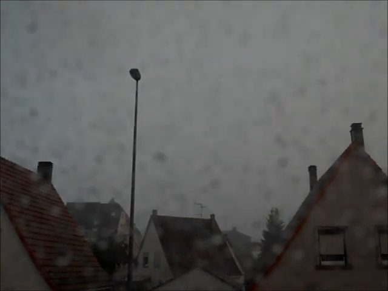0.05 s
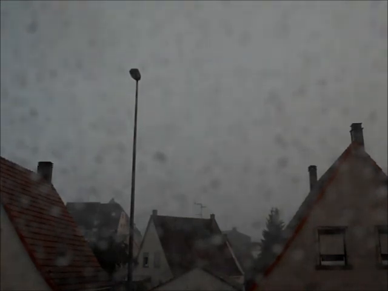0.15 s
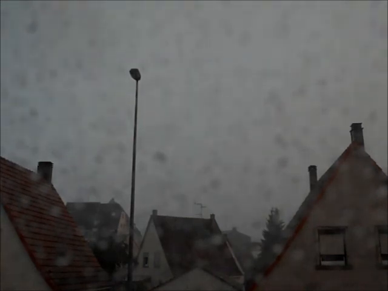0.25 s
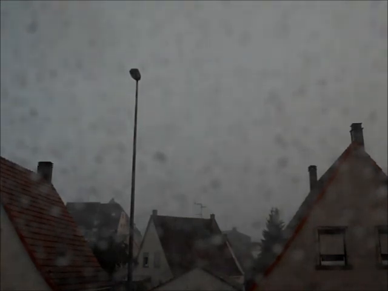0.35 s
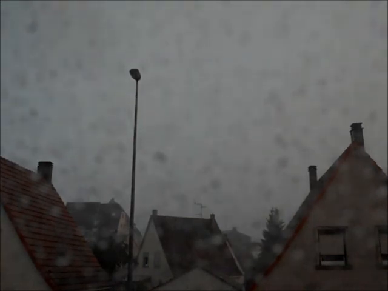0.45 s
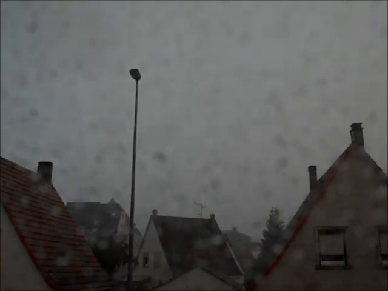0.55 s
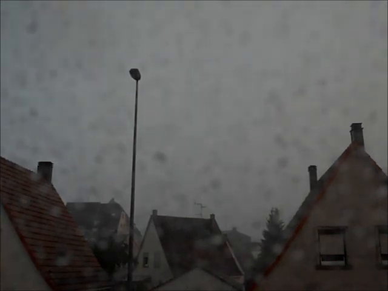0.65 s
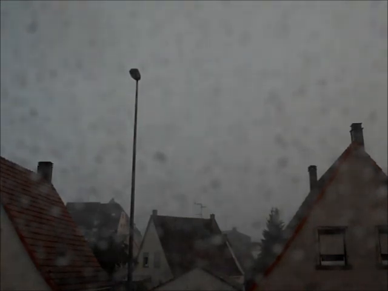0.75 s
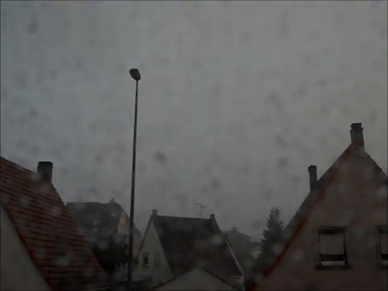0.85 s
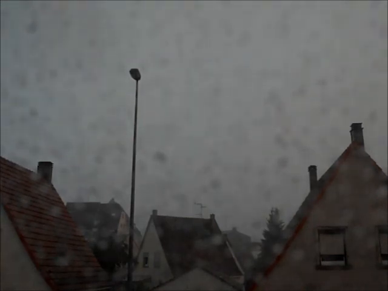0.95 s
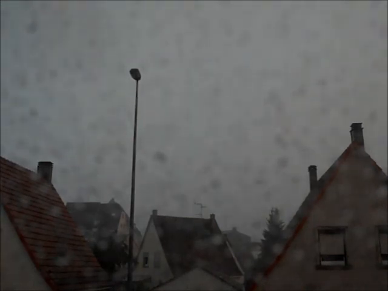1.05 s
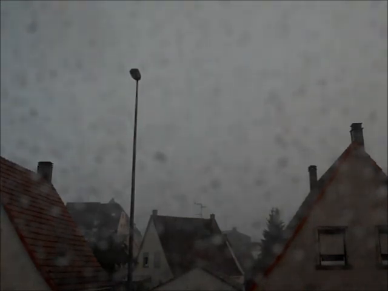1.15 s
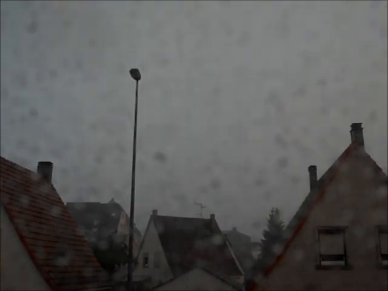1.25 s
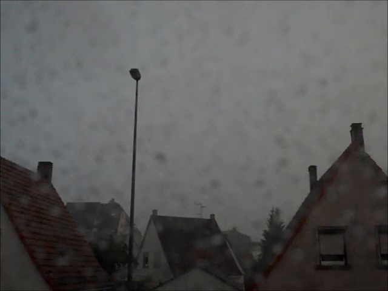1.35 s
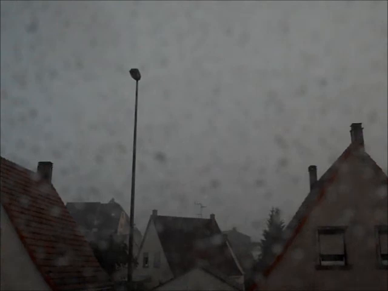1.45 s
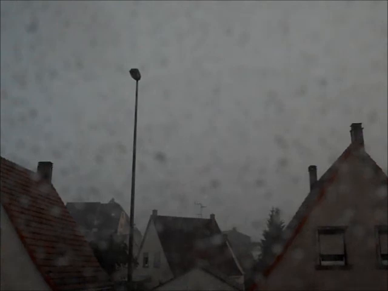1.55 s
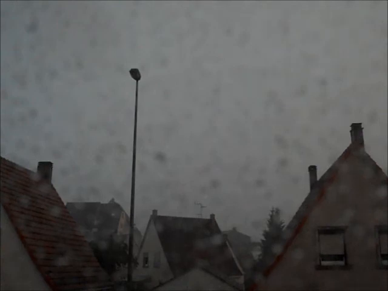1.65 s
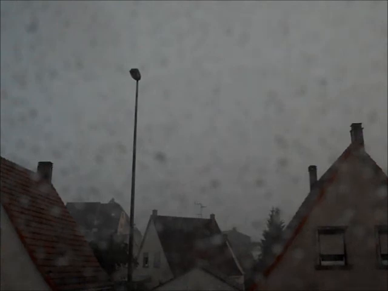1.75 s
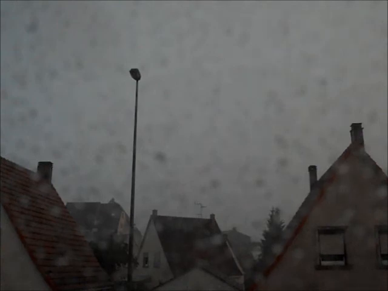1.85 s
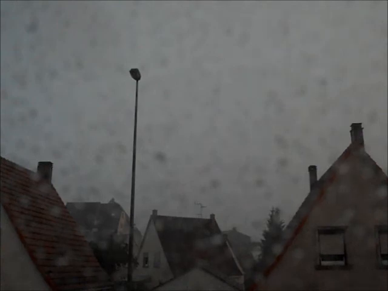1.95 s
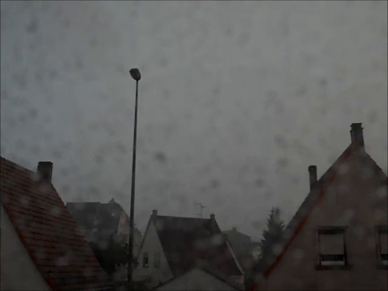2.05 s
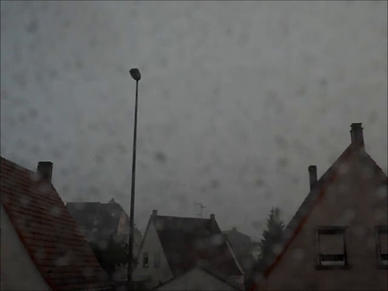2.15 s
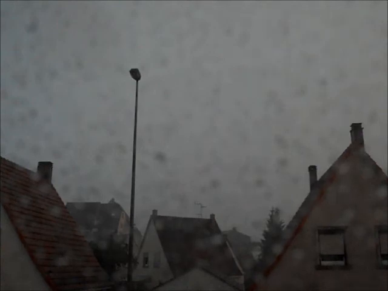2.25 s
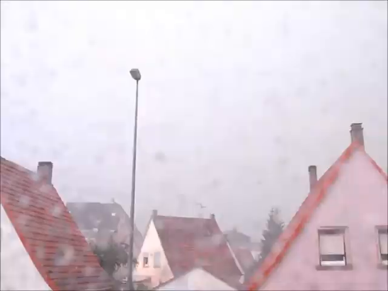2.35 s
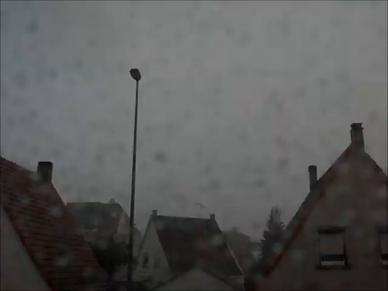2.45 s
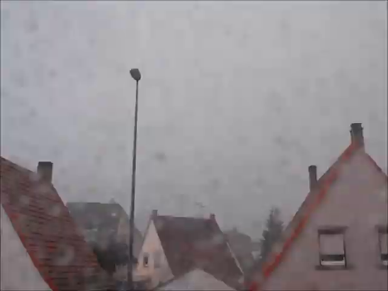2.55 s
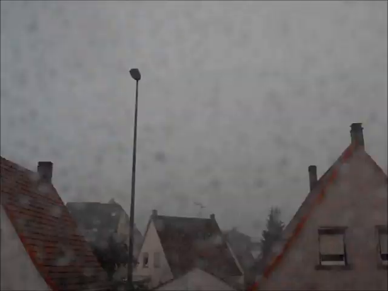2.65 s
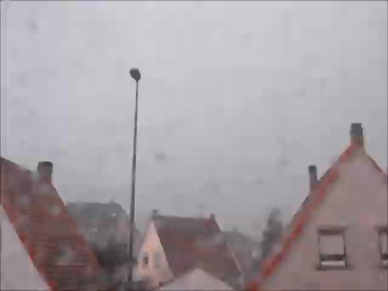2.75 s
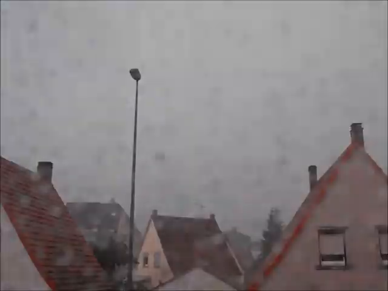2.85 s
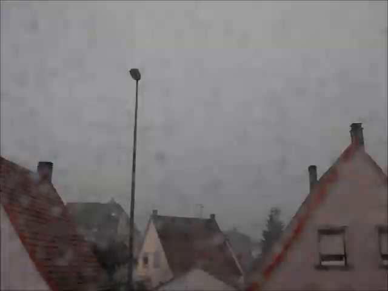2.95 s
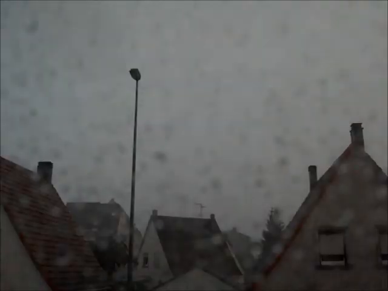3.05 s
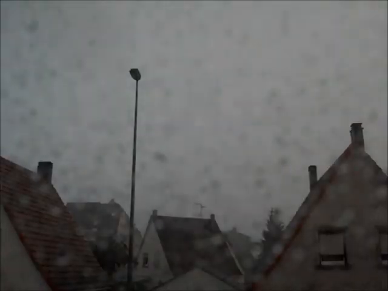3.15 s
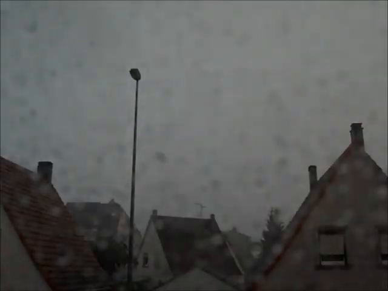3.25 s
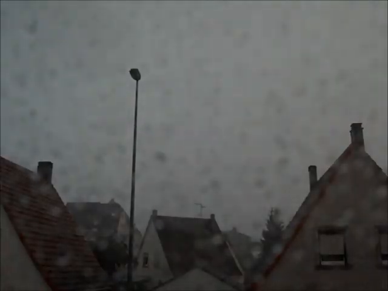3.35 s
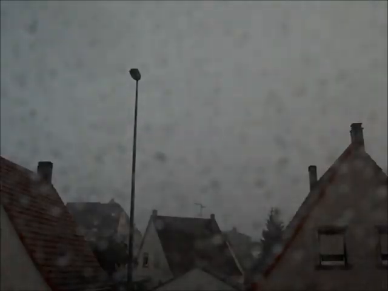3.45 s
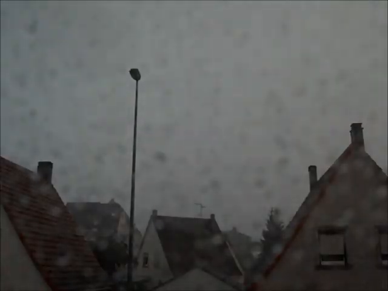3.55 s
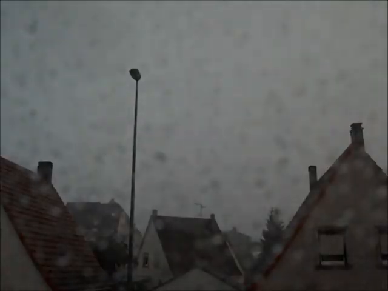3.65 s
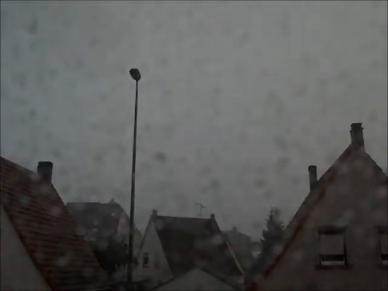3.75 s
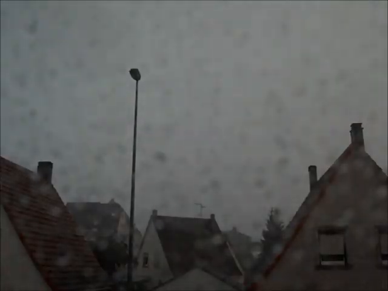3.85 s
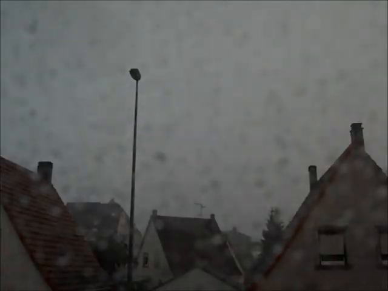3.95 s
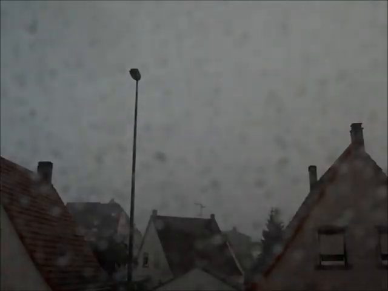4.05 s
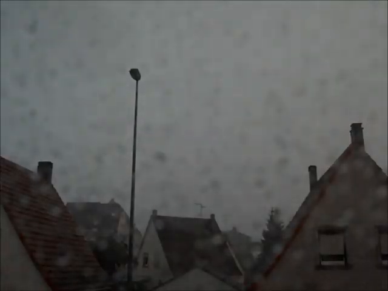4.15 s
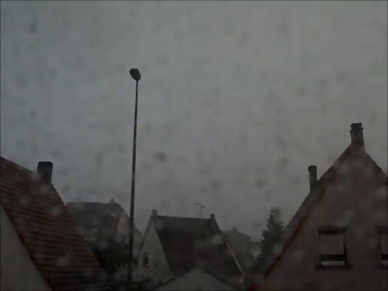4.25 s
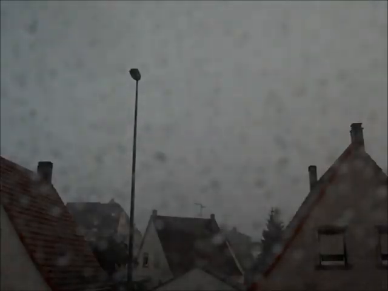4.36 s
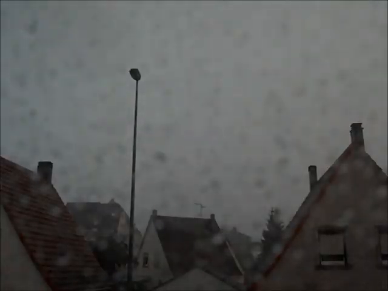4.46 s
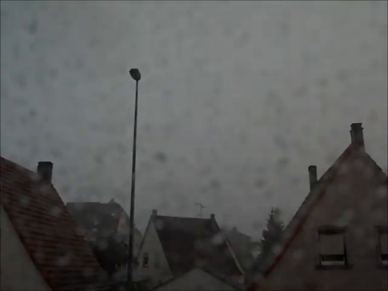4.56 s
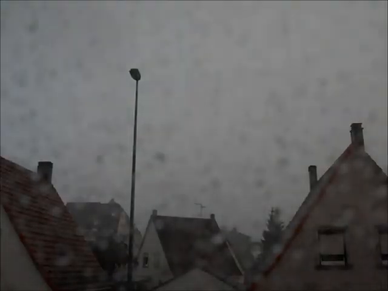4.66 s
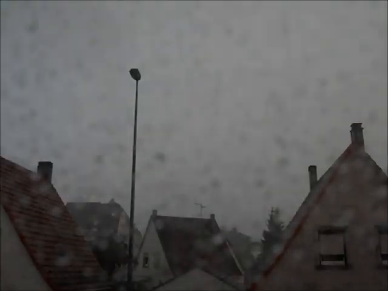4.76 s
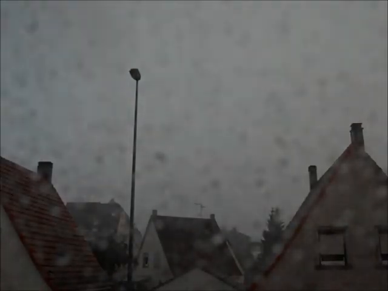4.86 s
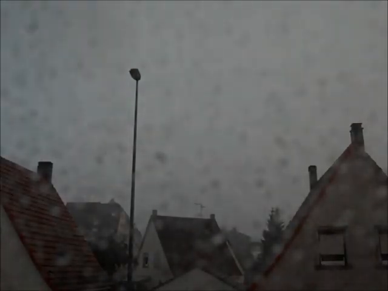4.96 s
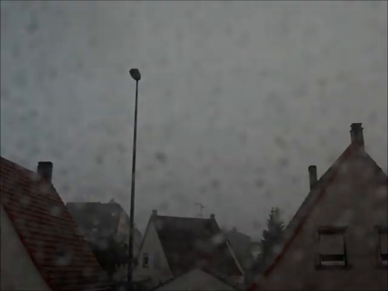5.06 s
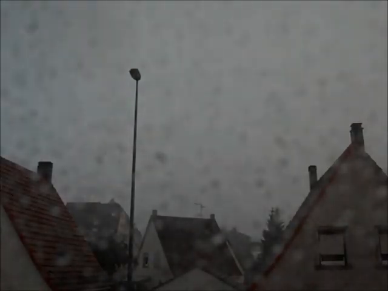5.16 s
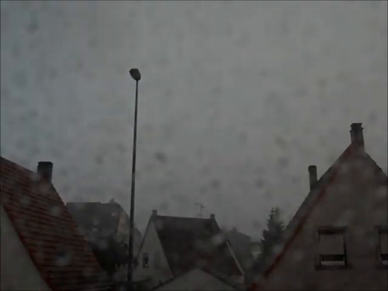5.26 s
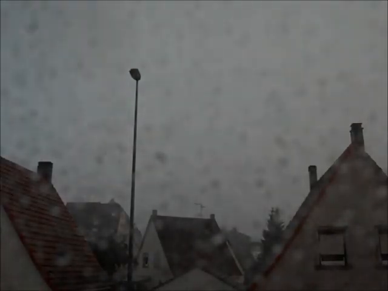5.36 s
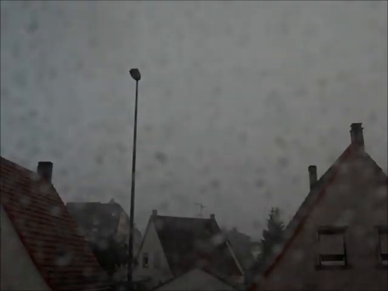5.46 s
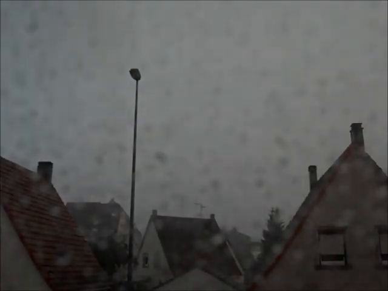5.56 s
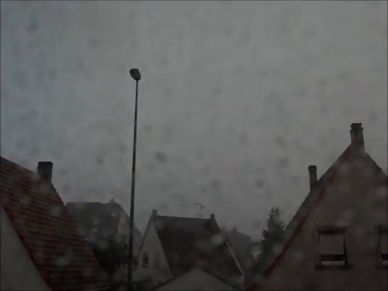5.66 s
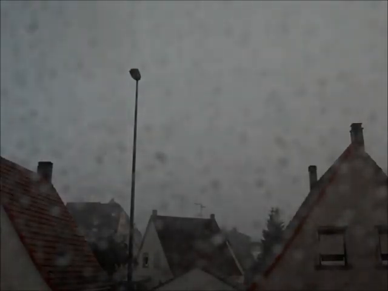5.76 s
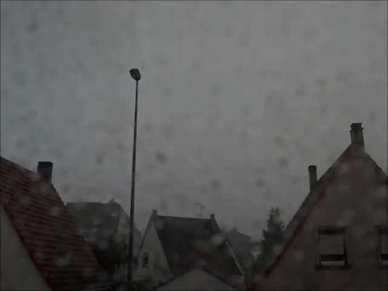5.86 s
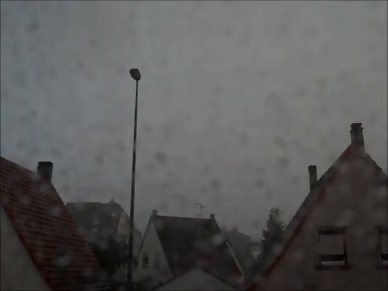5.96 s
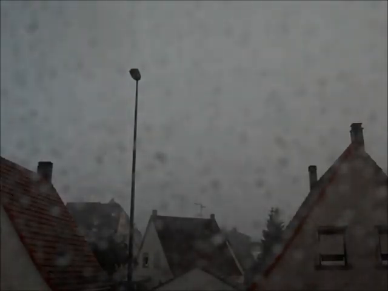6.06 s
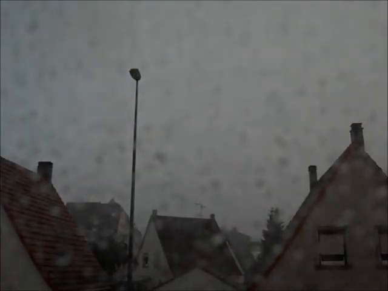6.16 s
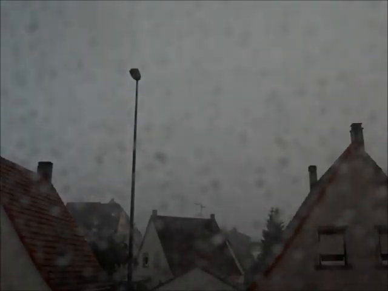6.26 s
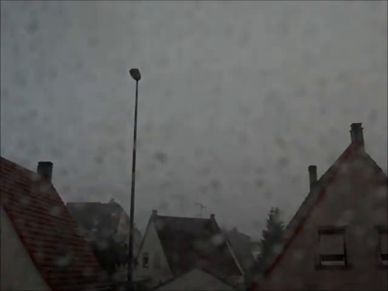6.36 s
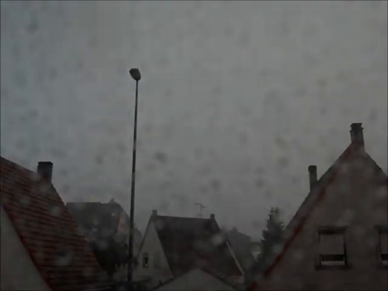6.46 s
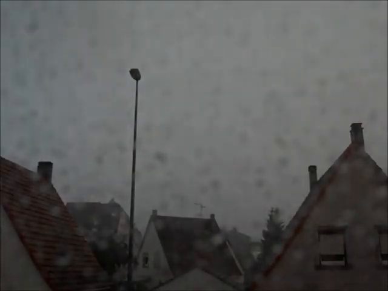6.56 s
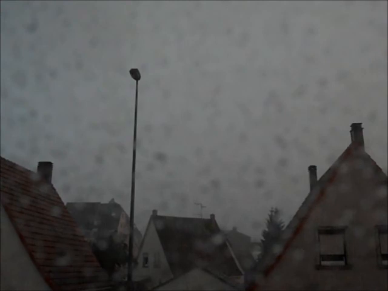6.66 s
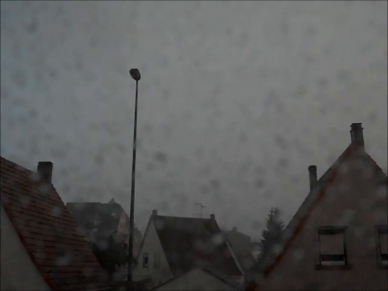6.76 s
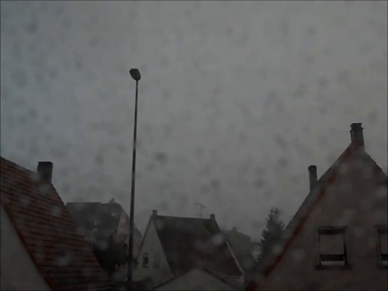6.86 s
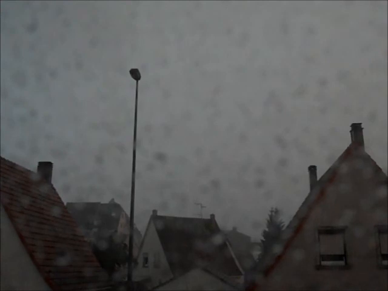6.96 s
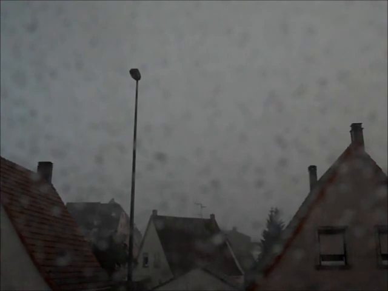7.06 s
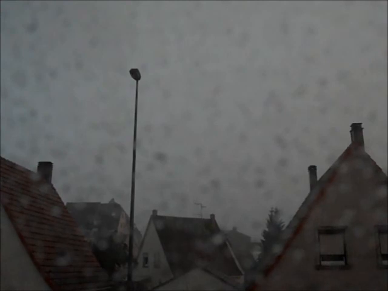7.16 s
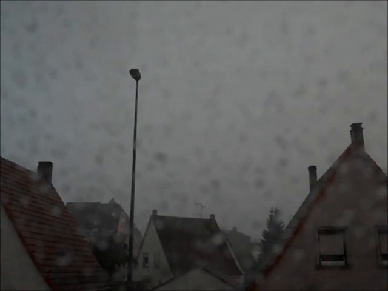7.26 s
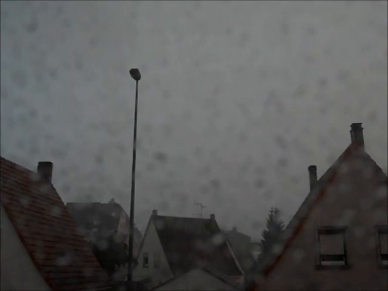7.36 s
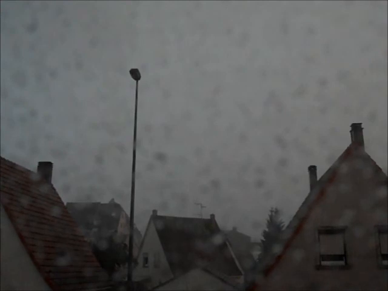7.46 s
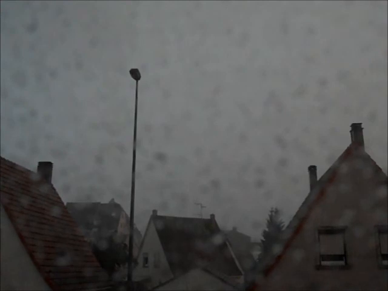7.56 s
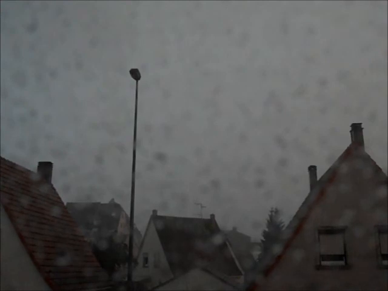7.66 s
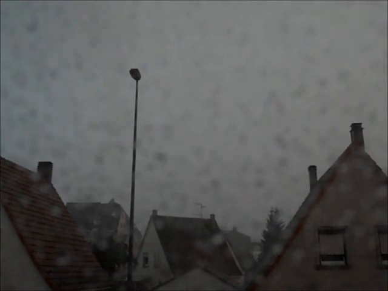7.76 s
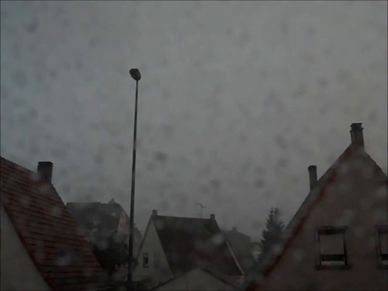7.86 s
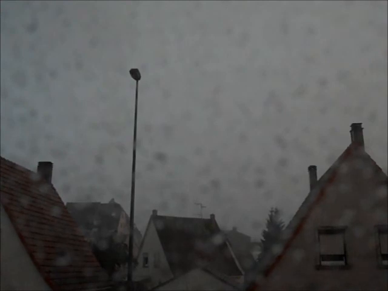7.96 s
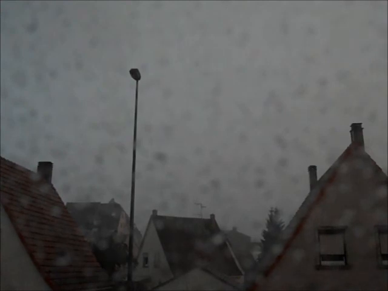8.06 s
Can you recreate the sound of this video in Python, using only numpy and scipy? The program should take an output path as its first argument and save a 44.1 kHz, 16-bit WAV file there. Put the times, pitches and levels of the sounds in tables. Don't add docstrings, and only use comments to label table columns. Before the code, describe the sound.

Low, steady storm rain is heard behind a closed window, with irregular hollow taps of big drops and tiny spray clicks through the first four seconds. The rain eases slightly before a sudden close thunderclap, dulled by the glass yet loud enough to clip the small microphone. Dense booms and crackles peak around six seconds, then sink into a distant, uneven rumble in the small reverberant room.

```python
import sys
import numpy as np
from scipy import signal
from scipy.fft import rfft, irfft, next_fast_len
from scipy.io import wavfile
from scipy.ndimage import uniform_filter1d, map_coordinates

SR = 44100
rng = np.random.default_rng(int(sys.argv[2]) if len(sys.argv) > 2 else 0)


def makeup_ratio(level_db):
    decades = np.asarray(level_db, float) / 20
    return 10 ** decades


def dump(signal):
    limited = np.clip(np.atleast_2d(signal).T, -1, 1)
    pcm = np.round(limited * 32767).astype(np.int16)
    wavfile.write(sys.argv[1], SR, pcm)


N = 357651

# (frequency [Hz], level [dB per Hz])
HISS_COLOUR = [(300, 0), (2000, 1.5), (4000, -1), (6000, -0.5), (7000, -1.5), (10000, -2.5), (13000, -4.5),
               (15800, -4.5)]
# (multiple [1], rms level [dB])
SENSOR_LEAK = [(1, -71), (2, -73.3), (5, -70.7), (6, -87.6), (7, -79.6), (8, -68)]
LINE_HZ = 7867.137

# (time [s], level [dB])
RAIN_LEVEL = [(0, -31.5), (.2, -35), (.6, -36.5), (1.06, -35.5), (1.5, -36), (1.78, -34.5), (2.0, -35.5),
              (2.18, -34), (2.4, -35), (3.05, -35.5), (3.16, -34.5), (3.3, -35.5), (3.9, -36.5),
              (4.55, -40.5), (4.9, -42)]
# (time [s], peak level [dB], ring frequency [Hz])
HEAVY_DROPS = [(0.04, -33, 592), (0.218, -23.5, 950), (0.47, -26, 590), (1.303, -22, 560),
               (1.414, -22, 610), (1.645, -29, 596), (2.075, -36, 670), (2.174, -20, 616),
               (2.286, -25, 540), (2.471, -29, 570), (2.542, -21, 615), (2.848, -28, 640),
               (3.004, -24, 1000), (3.153, -23, 584), (3.614, -22, 617), (3.711, -25.5, 614)]
# (time [s], peak level [dB])
SPRAY_SPITS = [
    (0.0094, -34),
    (0.0394, -41),
    (1.6794, -42),
    (2.3521, -45),
]
# (frequency [Hz], level [dB per Hz])
ROOF_COLOUR = [(12, -42), (20, -4), (49, -3.5), (86, -6.5), (199, -5), (274, -6.5), (300, -8), (330, -10),
               (430, -12), (730, -120)]
PATTER_COLOUR = [(180, -40), (300, -7.5), (328, -5), (387, -5.5), (420, -7.5), (538, -7.5), (616, -5),
                 (896, -11), (1050, -11.5), (1140, -11), (1450, -21), (1800, -30), (2340, -42.5),
                 (3960, -120)]
SPRAY_COLOUR = [(940, -37), (1600, 3.5), (2530, -1), (3280, -4), (3770, -9.5), (4500, -24), (5850, -44),
                (9900, -120)]
MEAN_RAIN_DB = -36
ROOF_DB, SPRAY_DB = -37, -53.5
ROOF_GROWS, SPRAY_GROWS = 0.1, 1.1

# (frequency [Hz], width [Hz], gain over the plain path [dB])
LOW_MODES = [(51.3, 13, 2.5), (85.4, 9.6, 0), (124, 10.3, 13.5), (156.5, 17, 13.5), (197.1, 10.6, 16),
             (217, 10, 11), (269.2, 10.6, 20)]
MID_MODES = [(437, 35, 2.7), (467, 13.6, 9.7), (532, 15, 0.86), (624, 260, 1.95), (755, 106, 2.5),
             (960, 28, 9.2), (1152, 90, 2.2), (1366, 16, 4)]
TOP_MODES = [(2583, 20, 2), (2782, 20, 6), (2987, 22, 10), (3345, 60, 3)]
# (frequency [Hz], 60 dB decay time [s])
ROOM_DECAY = [(100, 0.61), (300, 0.55), (1000, 0.74), (4000, 0.54)]

# (time [s], peak level [dB], front length [ms])
SHOCK_FRONTS = [(4.946, -23, 0.46), (4.999, -5, 0.24), (5.139, -7, 0.96), (5.283, -2, 0.54),
                (5.309, -4.5, 0.49), (5.369, -1, 0.44), (5.422, -4.5, 0.6), (5.46, -9, 0.53),
                (5.734, -1.5, 0.88), (5.756, 1, 0.49), (5.809, 1.5, 0.58), (5.859, 1, 0.63),
                (6.031, -2.5, 0.72), (6.843, -22, 0.58), (6.996, -31, 0.79), (7.072, -5, 0.46),
                (7.192, -4.5, 0.4), (7.694, -12, 0.48), (7.789, -12, 0.5), (7.962, -19, 0.59)]

# (time [s], level [dB])
THUNDER_LEVEL = [
    (4.925, -34),
    (4.955, -23.5),
    (5.12, -13.5),
    (5.33, -10.5),
    (5.5, -13.5),
    (5.85, -10.5),
    (6.3, -14.5),
    (6.65, -23),
    (8.11, -29.5),
]
MURMUR_DB_PER_S = 33
ROLL_DB, BOOM_DB, HUM_DB = -8, -5, -6.5
FAR_BASS_DB = 4.5
# (frequency [Hz], level [dB per Hz])
ROLL_COLOUR = [(12, -43), (20, -16), (43, -6), (86, -4), (135, -3.5), (180, -20), (300, -120)]
FAR_ROLL_COLOUR = [(12, -47), (20, -17), (32, -15), (48, -10), (59, -25), (91, -14), (113, -6), (135, 5.5),
                   (180, -21), (300, -120)]
# (frequency [Hz], level [dB per Hz])
BOOM_COLOUR = [(100, -29), (135, -7.5), (180, 6.5), (225, 3.5), (260, -19), (400, -75)]
HUM_COLOUR = [(170, -55), (230, -0.5), (250, 6.5), (300, -9), (350, -44), (500, -82.5)]
# (frequency [Hz], level [dB per Hz])
CRACKLE_COLOUR = [(180, -44), (310, -6.5), (450, -2.5), (519, -7), (628, -3), (890, -10.5), (967, -13),
                  (1040, -14.5), (1170, -13.5), (1900, -33.5), (2470, -68), (4180, -120)]
FAR_CRACKLE_COLOUR = [(180, -39), (310, 0), (383, -1), (430, -2), (519, -6.5), (725, -5.5), (857, -13),
                      (1170, -17.5), (1900, -35.5), (2470, -69), (4180, -120)]
# (frequency [Hz], level [dB per Hz])
RATTLE_COLOUR = [(1000, -21.5), (1700, -5), (1820, -25), (2050, -2.5), (2200, -4.5), (3140, -5.5),
                 (4200, -22), (5460, -57.5), (9240, -120)]
BUZZ_COLOUR = [(2800, -60), (2960, -6), (2987, 0), (3015, -6), (3200, -60)]
# (frequency [Hz], level [dB per Hz])
WALL_COLOUR = [(40, -60), (54, -2), (63, -3), (72, -5), (90, -65)]
# (crest time [s], level [dB], rise [dB per s], fall [dB per s])
WALL_SWELL = (7.5, -32.5, 19, 59)
# (crest time [s], level [dB], pitch [Hz], length [s])
CHANNEL_BOOMS = [(3.923, -32, 136, .15), (4.302, -32, 140, 0.13), (4.952, -17.5, 200, 0.048),
                 (5.052, -11, 205, 0.16), (5.168, -13, 110, .05), (5.195, -8.5, 270, 0.038),
                 (5.254, -17.5, 115, 0.035), (5.281, -6.5, 208, 0.062), (5.384, -5, 198, 0.046),
                 (5.606, -15, 195, .04), (5.68, -16, 267, .05), (5.757, -8, 143, .05),
                 (5.81, -4, 270, 0.097), (5.88, -13.5, 105, 0.071), (5.968, -8.5, 214, 0.037),
                 (6.072, -19, 105, .05), (6.196, -14.5, 270, 0.064), (6.224, -7, 176, 0.03),
                 (6.4, -14.5, 202, 0.077), (6.545, -23, 110, 0.033), (6.578, -18, 201, 0.031),
                 (7.088, -19, 205, 0.035), (7.108, -13.5, 270, 0.068), (7.21, -22, 190, .04),
                 (7.34, -18.5, 267, 0.15), (7.297, -22.5, 120, .07), (7.49, -18, 125, .07),
                 (7.71, -20, 202, 0.044), (7.797, -21, 115, 0.036), (7.965, -20.5, 265, 0.035)]
RISE_DB, FALL_DB = 12, 7.5
REACH_DB = 69
LEADING_FRONTS = [
    0,
    4.938,
    7.068,
]
FRONT_S = 0.0073


def unit(x):
    return x / np.sqrt(np.mean(x ** 2) + 1e-20)


def along(points, hz):
    f, v = np.transpose(points)
    return np.interp(np.log(hz + 1), np.log(f + 1), v)


def envelope(points):
    s, db = np.transpose(points)
    return makeup_ratio(np.interp(np.arange(N) / SR, s, db))


def wobble(rate):
    knots = rng.standard_normal(int(N * 60 / SR) + 4)
    return map_coordinates(knots, [np.arange(N) * min(rate, 60) / SR])


def filtered(x, response):
    m = next_fast_len(N + SR)
    return irfft(rfft(x, m) * response(np.fft.rfftfreq(m, 1 / SR)), m)[:N]


def ringing(f, modes, depth):
    resonances = sum(makeup_ratio(db) * 1j * f * w / (c * c - f * f + 1j * f * w) for c, w, db in modes)
    return 1 + depth * resonances


def swarm(rate, spread_db, wash):
    chance, size, sign = rng.random(N), rng.exponential(size=N), rng.standard_normal(N)
    strength = makeup_ratio(np.clip(spread_db, 0, 3) * np.minimum(size, 3))
    fronts = (chance < rate / SR) * np.sign(sign) * strength
    return unit(unit(fronts) + wash * rng.standard_normal(N))


def layer(drive, gain, colour, modes, depth, even=0.56):
    x = filtered(drive, lambda f: makeup_ratio(along(colour, f)) * ringing(f, modes, depth))
    swell = uniform_filter1d(uniform_filter1d(x ** 2, size=1600), size=1600)
    return gain * unit(x / (np.abs(swell) + 1e-30) ** (even / 2))


def room(x):
    hz, t, z = signal.stft(rng.standard_normal(SR // 2), SR, nperseg=256)
    decay = makeup_ratio(-60 * t / along(ROOM_DECAY, hz)[:, None])
    tail = signal.istft(z * decay, SR, nperseg=256)[1]
    return signal.fftconvolve(x, tail / np.linalg.norm(tail))[:N]


def electronics():
    t = np.arange(N) / SR
    turn = (t * LINE_HZ / 525 + 0.057) % 1
    phasor = np.where(turn < 0.5, 0.0062 * np.exp(1.35j), 0.0039 * np.exp(-0.45j))
    phasor = phasor * makeup_ratio(0.44 + 3 * (turn - 0.17) * (turn < 0.5))
    blank = 1 - 1.3 * np.exp(-((turn - 0.5) / 0.0091) ** 2)
    whine = np.real(phasor * blank * np.exp(2j * np.pi * LINE_HZ * t))
    leak = sum(np.sqrt(2) * makeup_ratio(db) * np.sin(2 * np.pi * k * LINE_HZ / 4 * t) for k, db in SENSOR_LEAK)
    hiss = layer(rng.standard_normal(N), makeup_ratio(-49), HISS_COLOUR, TOP_MODES, depth=0.6, even=0)
    return whine + leak * (1 + 0.4 * np.sin(4 * np.pi * turn + 1.2)) + hiss


def drops():
    knocks, t = np.zeros(N + 2000), np.arange(2000) / SR
    for s, db, hz in HEAVY_DROPS:
        decay = makeup_ratio(db - 4.5 - 60 * t / 0.066)
        onset = 1 - np.exp(-t / 0.00097)
        knocks[round(s * SR):][:len(t)] += decay * onset * np.sin(2 * np.pi * hz * t)
    for s, db in SPRAY_SPITS:
        decay = makeup_ratio(db - 60 * t / 0.022)
        knocks[round(s * SR):][:len(t)] += decay * np.diff(rng.standard_normal(len(t) + 1))
    return knocks[:N]


def rain():
    patter = envelope(RAIN_LEVEL)
    driven = patter / makeup_ratio(MEAN_RAIN_DB)
    roof = makeup_ratio(ROOF_DB) * driven ** ROOF_GROWS
    spray = makeup_ratio(SPRAY_DB) * driven ** SPRAY_GROWS
    gust = makeup_ratio(0.99 * wobble(13))
    drum = layer(swarm(200, 4, wash=1.95), roof * gust, ROOF_COLOUR, LOW_MODES, depth=0.16)
    glass = layer(swarm(600, 2.6, wash=1.3), patter * gust, PATTER_COLOUR, MID_MODES, depth=0.21)
    mist = layer(swarm(1500, 2.9, wash=2.3), spray * gust, SPRAY_COLOUR, TOP_MODES, depth=0.15)
    return drum + glass + mist + drops()


def window(f):
    return f / (f - 120j) / (1 + 1j * f / 1100) ** 2


def shocks():
    blows, t = np.zeros(N + 900), np.arange(900) / SR
    for s, db, ms in SHOCK_FRONTS:
        u = t / (ms / 1000)
        blows[round(s * SR):][:len(t)] -= makeup_ratio(db - 3) * (1 - u / 3) * u * u * np.exp(1 - u)
    rung = filtered(blows[:N], lambda f: ringing(f, LOW_MODES + MID_MODES, 0.44) * window(f))
    return rung + makeup_ratio(4.0) * room(rung)


def crest(s, rise_db, fall_db):
    late = np.arange(N // 50 + 1) * 50 / SR - s
    return makeup_ratio(np.maximum(np.where(late < 0, rise_db * late, -fall_db * late), -120))


def booming(base, hz):
    t = np.arange(N // 50 + 1) * 50 / SR
    power = 0
    for s, db, pitch, length in CHANNEL_BOOMS:
        nearness = makeup_ratio(db - REACH_DB * np.log2(pitch / hz) ** 2)
        boom = nearness * crest(s, RISE_DB / length, FALL_DB / length)
        leader = max(f for f in LEADING_FRONTS if f < s)
        arrival = np.clip((t - leader) / FRONT_S, 0, 1)
        power = power + boom ** 2 * arrival ** 2
    return np.sqrt(base ** 2 + np.repeat(power, 50)[:N])


def thunder():
    t = np.arange(N) / SR
    crackle = envelope(THUNDER_LEVEL) * makeup_ratio(MURMUR_DB_PER_S * np.minimum(t - THUNDER_LEVEL[0][0], 0))
    clumps = makeup_ratio(0.3 * wobble(25))
    rattle = makeup_ratio(-29) * crackle ** 1.09
    far = np.clip((t - 6.3) / 0.81, 0, 1)
    near = np.sqrt(1 - far ** 2)

    low = crackle * makeup_ratio(FAR_BASS_DB * far)
    roll = booming(low * makeup_ratio(ROLL_DB), hz=110)
    boom = booming(low * makeup_ratio(BOOM_DB), hz=195)
    hum = booming(low * makeup_ratio(HUM_DB), hz=270)
    deep = layer(swarm(80, 3.7, wash=0.99), roll * near, ROLL_COLOUR, LOW_MODES, depth=0.37)
    deep += layer(swarm(74, 2.6, wash=1.7), roll * far, FAR_ROLL_COLOUR, LOW_MODES, depth=1.0)
    body = layer(swarm(150, 3.16, wash=1.15), boom * clumps, BOOM_COLOUR, LOW_MODES, depth=3.1)
    pane = layer(swarm(140, 4.1, wash=2.64), hum * clumps, HUM_COLOUR, LOW_MODES, depth=1.0)

    kinks = layer(swarm(500, 4.4, wash=1.95), crackle * clumps * near, CRACKLE_COLOUR, MID_MODES, depth=0.3)
    kinks += layer(swarm(500, 2.0, wash=2.06), crackle * clumps * far, FAR_CRACKLE_COLOUR, MID_MODES, depth=0.3)
    frame = layer(swarm(900, 1.1, wash=8.1), rattle * clumps, RATTLE_COLOUR, TOP_MODES, depth=0.46)

    s, db, rise_db, fall_db = WALL_SWELL
    swell = makeup_ratio(db) * np.repeat(crest(s, rise_db, fall_db), 50)[:N]
    swell = swell * far + makeup_ratio(-20) * crackle
    buzz = layer(rng.standard_normal(N), makeup_ratio(-64.5) * far, BUZZ_COLOUR, [], depth=0)
    drone = layer(rng.standard_normal(N), swell, WALL_COLOUR, [], depth=0)
    return drone + buzz + deep + body + pane + kinks + frame


def scene():
    return (rain() + shocks() + thunder())[None]


def roll_off(x):
    return signal.sosfilt(signal.butter(12, 17110, fs=SR, output="sos"), x)


def record(dry):
    full = np.clip(dry[0], -1.003, 1.003)
    smooth = filtered(full, lambda hz: 1 / np.sqrt(1 + (hz / 8000) ** 4))
    mix = filtered(smooth + electronics() - 0.0038, lambda hz: hz < 16200)
    return roll_off(mix[None])


dry = scene()
out = record(dry)
dump(out)
```